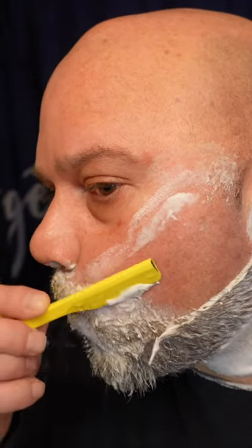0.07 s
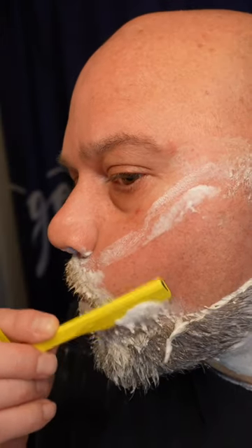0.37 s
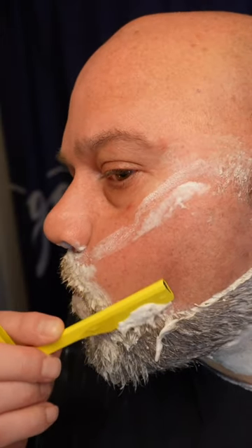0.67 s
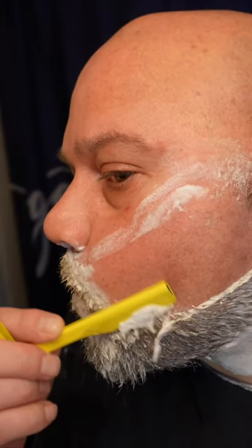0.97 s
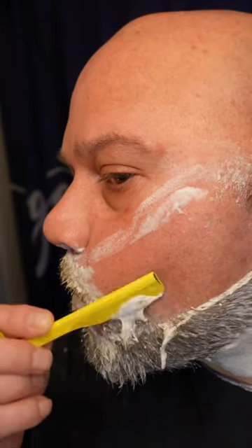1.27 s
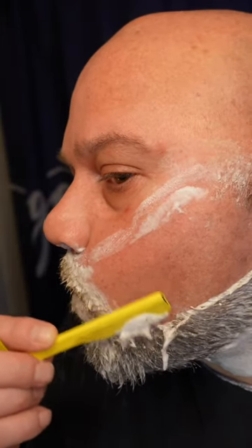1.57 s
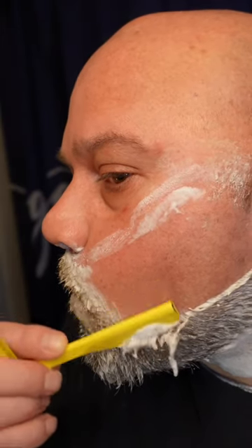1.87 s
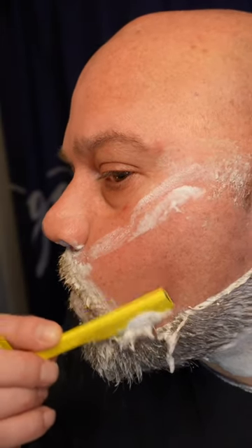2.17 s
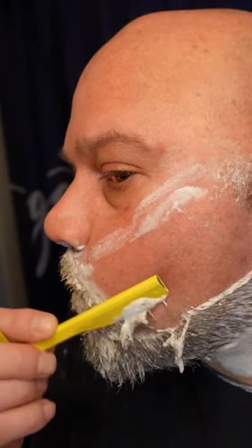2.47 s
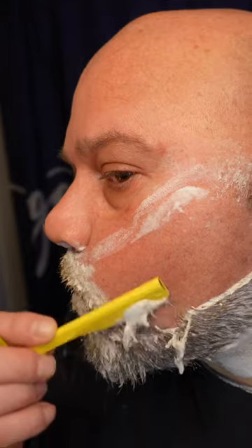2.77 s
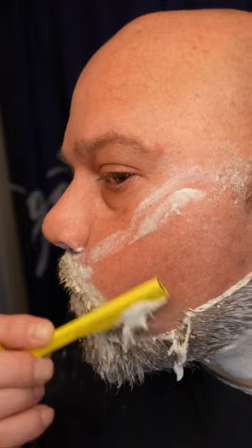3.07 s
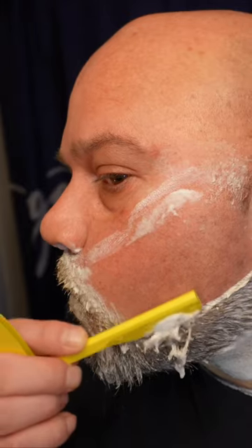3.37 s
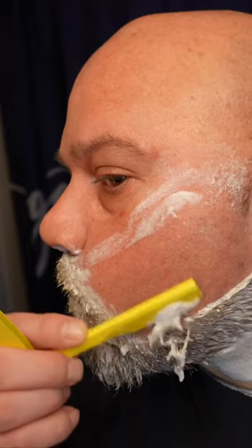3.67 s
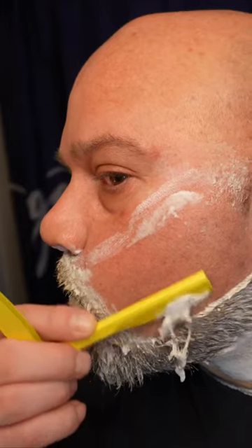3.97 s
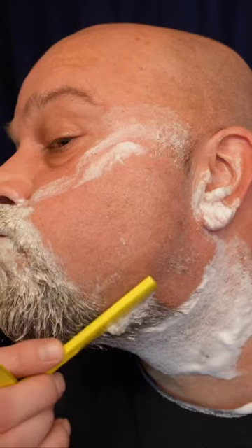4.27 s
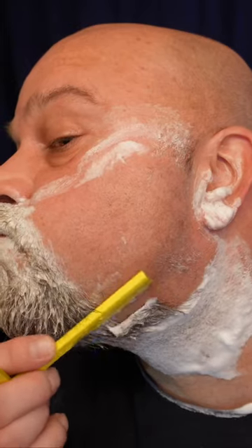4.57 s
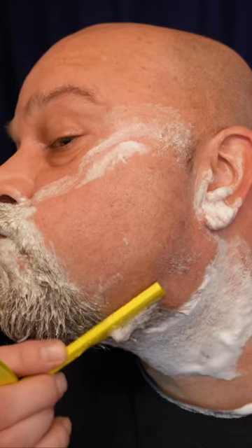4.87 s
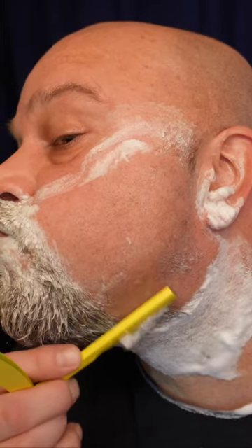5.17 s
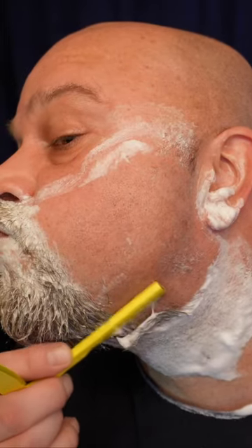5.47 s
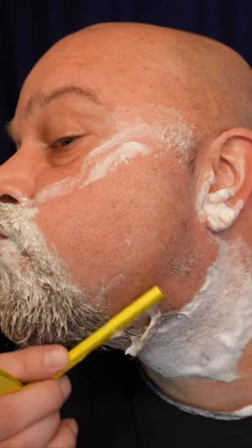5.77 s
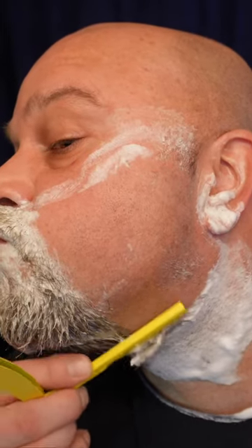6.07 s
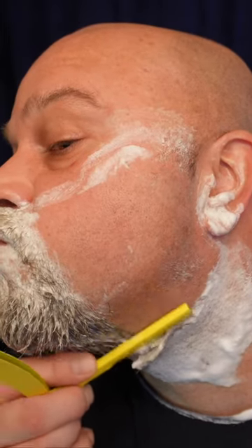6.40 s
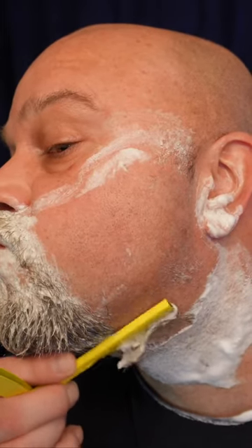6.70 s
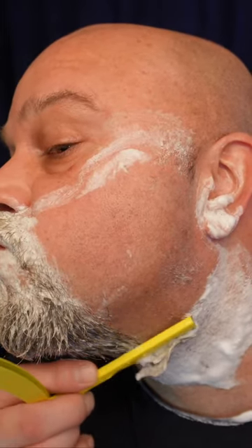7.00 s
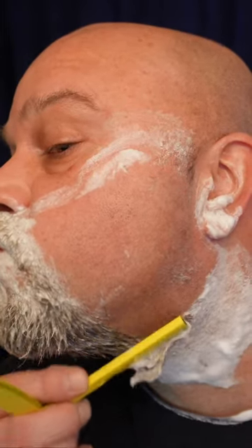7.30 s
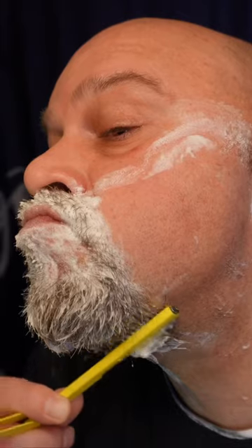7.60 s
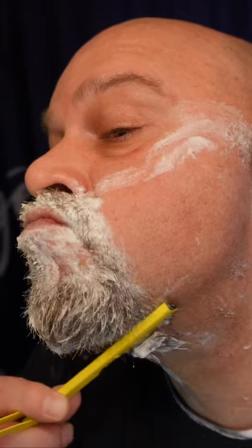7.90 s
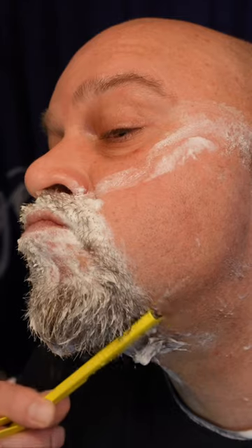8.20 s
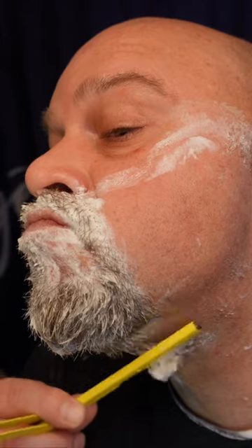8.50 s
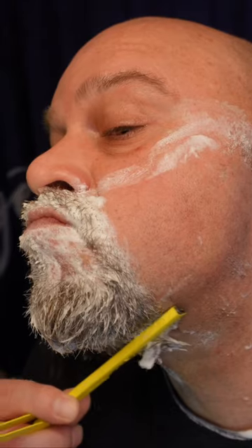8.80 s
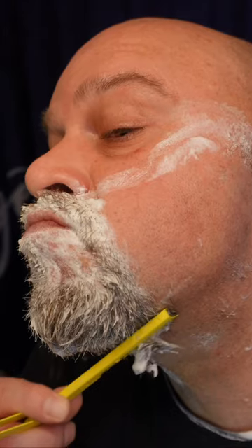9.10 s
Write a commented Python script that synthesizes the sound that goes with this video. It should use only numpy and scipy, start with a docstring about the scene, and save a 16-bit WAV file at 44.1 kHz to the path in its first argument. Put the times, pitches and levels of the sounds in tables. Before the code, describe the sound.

A straight razor scrapes through lathered stubble in short, regular, crackling strokes, close up in a quiet room with a faint hum.

```python
"""Straight razor on lathered stubble.

Short, close strokes in a quiet room: cheek, then jaw, then neck. The edge cuts thousands of fine
hairs and snaps single coarse ones; every cut rings in blade and holder. Sliding back over wet skin,
the blade squeaks faintly. Behind it: appliance hum, a soft whirr, rumble and hiss."""
import sys
import numpy as np
from scipy import signal
from scipy.fft import rfft, irfft
from scipy.io import wavfile

SR = 44100
rng = np.random.default_rng(int(sys.argv[2]) if len(sys.argv) > 2 else 0)


def wav_record(signal):
    """Record a signal, one row per channel, as 16-bit PCM in the file named by sys.argv[1]."""
    frames = np.transpose(np.atleast_2d(signal))
    bounded = np.clip(frames, -1, 1)
    # unit amplitude maps onto the largest positive 16-bit level
    quanta = np.round(bounded * 32767).astype(np.int16)
    wavfile.write(sys.argv[1], SR, quanta)


N = 407925
TIME = np.arange(N) / SR
JAW_FROM_S, NECK_FROM_S = 4.015, 7.3
LANDING_DB, LANDING_S = 2, .012   # edge lands this much lighter; settling time
PRESS_DB_PER_S = 14   # hand bears down as it pulls
STALL_S, TUFT_S = 0.021, 0.0096   # edge hangs before digging in; edge held by a tuft
FACE_CRACK_HZ, NECK_CRACK_HZ, CRACK_SPREAD = 6900, 5000, 0.12   # thicker neck whiskers crack lower
FIRM_DB, FIRM_RING_DB_PER_DB = -33, 0.18   # above this force the holder rings more
CUTOFF_HZ = 16000

# strokes: landing t/s, light phase/s, dug-in phase/s, light level/dB, full level/dB,
# stall depth/dB, treble from blade angle/dB
STROKE_PLAN = [(0.087, 0.1, 0.032, -40.5, -33, 1, 1.5), (.5, 0.089, 0.051, -36.5, -29, 0.5, 0.5),
               (0.913, 0.069, 0.08, -38, -33, 2, -1.5), (1.302, 0.073, 0.065, -34.5, -29.5, -1.5, -1.5),
               (1.685, 0.063, 0.075, -37, -27.5, -2, 1), (2.075, 0.032, 0.11, -39.5, -33.5, -3.5, -1.5),
               (2.431, 0.043, 0.086, -48.5, -34.5, -2, .5), (2.805, .043, 0.054, -40, -37, 3, 0.5),
               (3.149, 0.067, 0.13, -44.5, -41.5, 1.5, -0.5), (3.55, .048, 0.084, -43, -44.5, 0.5, 0),
               (3.888, .058, .057, -53.5, -43, -1, 0), (4.12, 0.13, 0.047, -43.5, -36, 6, -6),
               (4.525, 0.051, 0.12, -48.5, -44, 0, 2.5), (4.945, 0.11, 0.093, -47, -35, 0.5, -3.5),
               (5.433, 0.12, 0.047, -35.5, -31.5, 15, -2.5), (5.862, .072, 0.11, -42.5, -37, 3, -1),
               (6.273, .087, 0.11, -46, -39.5, -2.5, -3), (6.706, 0.043, 0.15, -45, -43.5, -1.5, -4),
               (7.419, 0.12, 0.067, -45.5, -34, 5, 0), (7.783, 0.16, 0.028, -44, -36, 6, 0.5),
               (8.232, 0.14, 0.051, -42, -36, 8.5, 2.5), (8.663, 0.11, 0.083, -46, -40, 4, 2),
               (9.13, 0.042, 0.062, -46.5, -40, 0, -0.5)]
# tufts catching the edge, mostly at lift-off: t/s, level/dB
TUFT_CATCHES = [(0.023, -45.5), (0.31, -42.5), (0.696, -38), (1.494, -38.5), (1.886, -39.5), (2.261, -36.5),
                (2.646, -42.5), (2.955, -45.5), (3.995, -42.5), (4.193, -38), (4.38, -43.5), (4.834, -40.5),
                (5.121, -28), (5.658, -40.5), (6.034, -40), (6.121, -41), (6.522, -39), (6.968, -41.5),
                (7.192, -55), (7.452, -42.5), (7.652, -51), (8.083, -37.5), (8.418, -33.5)]
# light return slides: start t/s, end t/s, level/dB
RETURN_SLIDES = [(.44, 0.488, -57), (1.572, 1.612, -58), (4.073, 4.11, -56), (6.56, 6.697, -60),
                 (6.92, 6.965, -51), (7.677, 7.776, -54), (8.027, 8.064, -52.5), (9.042, 9.11, -60)]
# loudest whisker snaps: t/s, relative level/dB, f/Hz
WHISKER_SNAPS = [(0.193, -4, 5000), (.216, -5, 5800), (.3125, -10, 9500), (.5657, 1, 6500),
                 (.6013, 0.5, 8300), (.6104, 0, 6700), (0.6271, 2.5, 5900), (0.6384, -1.5, 6900),
                 (1.0462, 1, 6000), (1.3385, -3, 5700), (1.374, 0.5, 6500), (1.391, 0, 6700),
                 (1.4036, -3, 6500), (1.432, 0, 6500), (1.4429, -2, 6700), (1.4469, 0, 6700),
                 (1.7237, -1, 7600), (1.736, 1.5, 8640), (1.7637, 3, 8900), (1.7934, 0, 8700),
                 (1.8883, -7.5, 7400), (2.1536, -1, 6700), (2.1927, -0.5, 6500), (2.2256, -3.5, 8900),
                 (2.4679, -6, 7900), (2.5523, -23, 6700), (2.6481, -10, 8500), (2.9285, -7.5, 5900),
                 (3.7577, -18.5, 9700), (3.9224, -25, 7100), (4.138, -9, 7400), (4.1687, -10.5, 6500),
                 (4.1905, -8.5, 6300), (4.205, -12, 4500), (4.2423, -8.5, 6800), (4.3885, -19.5, 9400),
                 (4.5732, -8.5, 11300), (4.6349, -8.5, 10900), (4.654, -11, 7800), (4.6822, -11, 6300),
                 (5.1064, -8, 6300), (5.5233, -9.5, 8780), (5.5552, -4.5, 5850), (5.8613, -14, 5570),
                 (6.2, -24, 7800), (6.451, -5.5, 6540), (6.5313, -11, 5600), (6.711, -30, 6430),
                 (6.9131, -11, 7000), (7.417, -19.5, 3900), (7.4261, -14, 4500), (7.4576, -15.5, 3700),
                 (7.4835, -19, 3750), (7.529, -15, 5100), (7.8694, -12.5, 4060), (7.9113, -9, 4370),
                 (8.0783, -16, 7000), (8.2714, -19, 4180), (8.286, -11.5, 3500), (8.4252, -32, 6000),
                 (8.7455, -10, 5270), (9.1299, -19.5, 5700), (9.1439, -14, 4000), (9.185, -9, 4400),
                 (9.1961, -8.5, 4500)]
# squeaks on wet skin: t/s, length/s, start f/Hz, middle f/Hz, end f/Hz, level/dB
SKIN_SQUEAKS = [(0.796, 0.15, 5300, 5250, 4630, -59), (1.157, 0.085, 4420, 4580, 4120, -56),
                (3.082, .09, 4200, 4470, 4500, -56), (3.414, 0.16, 4600, 4530, 4300, -55.5),
                (3.796, 0.12, 4500, 4620, 4550, -58), (5.689, 0.079, 3000, 3170, 3230, -54),
                (5.742, 0.064, 4400, 4230, 3920, -55), (7.623, 0.2, 10500, 11900, 10600, -59)]
# holder's freedom to ring in the grip, below about 3 kHz: t/s, level/dB
GRIP_RING = [(.2, 3.5), (.6, 2.5), (1.0, 1), (1.5, 1.5), (2.7, .5), (3.3, -3.5), (4.3, -.5), (5.6, 0),
             (6.4, 1), (6.85, -1.5), (7.5, 2.5), (9.2, 1)]
# razor colour per position: f/Hz, relative level/dB
CHEEK_COLOUR = [(600, -44), (1100, -32), (1400, -22.5), (1680, -20.5), (1950, -10.5), (3500, -9),
                (5000, -8), (8500, -5.5), (10500, -15), (13000, -16.5), (15500, -26)]
JAW_COLOUR = [(600, -27), (1100, -29), (1650, -13), (1950, -8), (3500, -8.5), (5000, -9), (8500, -2.5),
              (10500, -11), (13000, -10.5), (15500, -20)]
NECK_COLOUR = [(600, -52), (1100, -26), (1650, -17.5), (1900, -14), (3500, -13.5), (5000, -11.5),
               (8500, -4.5), (10500, -15.5), (13000, -18.5), (15500, -28)]
# blade and holder resonances per position: f/Hz, width/Hz, level/dB
CHEEK_PEAKS = [(1880, 150, 1), (2412, 246, 9), (3170, 340, 1.5), (4700, 340, 4), (5360, 300, 7),
               (6420, 260, 4), (7905, 720, 5.5), (12700, 600, 3)]
JAW_PEAKS = [(2114, 122, 9.7), (2340, 126, 6.2), (3230, 650, 1.5), (4930, 1250, 7.3), (6300, 160, 1.8),
             (7600, 310, 3.6), (11900, 270, 2.5)]
NECK_PEAKS = [(1950, 480, 8.8), (2750, 170, 11), (4280, 1230, 10.6), (5020, 520, 9.4), (6350, 130, 9.7),
              (7340, 1100, 0.93), (13750, 590, 4.7)]
# appliance hum: harmonic number, relative level/dB
HUM_HARMONICS = [(1, -2), (3, -20.5), (4, -13), (5, -19), (6, -25), (8, -23)]
# first hum's swell, lower hum's fade: t/s, level/dB
HUM_SWELL = [(0, -58.5), (1.7, -59), (2.7, -57), (3.1, -55.5), (4.0, -54.5)]
LOW_HUM_FADE = [(4.0, -61), (5.5, -66), (7.0, -67.5), (9.2, -75)]
# whirr swells: peak t/s, level/dB, rise/(dB/s), fall/(dB/s)
WHIRR_ENVELOPE = [(1.9, -59.5, 68, 24), (3.6, -61, 26, 28)]
# spectra of whirr, rattle, room noise before and after JAW_FROM_S: f/Hz, relative level/dB
WHIRR_COLOUR = [(100, -17), (210, -9.5), (275, 1), (345, 5), (410, -7), (900, -24), (4000, -34)]
RATTLE_COLOUR = [(300, -18), (750, -10), (980, -9), (1170, -2.5), (1400, -10), (2000, -8.5), (3500, -13),
                 (10000, -27)]
EARLY_ROOM_COLOUR = [(20, -1), (45, -3), (110, 2.5), (200, -2), (320, 0), (450, -2.5), (800, -4),
                     (1200, -9), (2200, -11), (5000, -10), (8500, -11), (11000, -17.5), (16000, -23)]
LATE_ROOM_COLOUR = [(20, -4), (45, -6.5), (125, 0), (170, -2), (370, -1), (550, -4.5), (880, -3.5),
                    (1150, -8.5), (2200, -11.5), (5000, -11), (8500, -11.5), (11000, -19), (16000, -25.5)]
# late room noise resonances: f/Hz, width/Hz, level/dB
LATE_ROOM_PEAKS = [(127, 11, 4.5), (460, 15, 3.5), (695, 10, 11.5)]


def drag(rise_db_per_s=1100, dig_db_per_s=1200, lift_db_per_s=320, graze_db=-16, graze_db_per_s=115,
         approach_db_per_s=350, catch_db_per_s=4000, release_db_per_s=700):
    """Force on the edge: strokes land, stall, dig in, lift off grazing; tufts tug, slides rub."""
    t, power = TIME[::40], 1e-12
    for land, light_s, full_s, light_db, full_db, stall_db, _ in STROKE_PLAN:
        dig = land + light_s
        lift = dig + full_s
        held = np.clip(t, land, lift)
        before, after = np.maximum(land - t, 0), np.maximum(t - lift, 0)
        ease = LANDING_DB * np.exp((land - held) / LANDING_S)
        stall = stall_db * np.exp(-((held - dig + STALL_S) / STALL_S) ** 2)
        light = light_db + PRESS_DB_PER_S * (np.minimum(held, dig) - (land + dig) / 2) - stall - ease
        full = full_db + PRESS_DB_PER_S * (held - (dig + lift) / 2)
        full -= dig_db_per_s * np.maximum(dig - held, 0)
        pull = -rise_db_per_s * before - lift_db_per_s * after
        graze = graze_db - approach_db_per_s * before - graze_db_per_s * after
        same_place = (t < JAW_FROM_S) == (land < JAW_FROM_S)   # a stroke's sound stops abruptly at JAW_FROM_S
        power += same_place * from_db(np.maximum(light, full) + np.maximum(pull, graze)) ** 2
    for start, end, db in RETURN_SLIDES + [(s, s + TUFT_S, db) for s, db in TUFT_CATCHES]:
        fade_db = catch_db_per_s * np.maximum(start - t, 0) + release_db_per_s * np.maximum(t - end, 0)
        power += from_db(db - fade_db) ** 2
    return np.interp(TIME, t, np.sqrt(power))


def scrape(hairs_per_s=1300, spread_db=4.0, clump_db=1.57, cut_db=-3.0, rub_db=-5.0):
    """A harder stroke meets more hairs; they stand in clumps, and the edge rubs the skin between."""
    force = drag()
    per_s = hairs_per_s * np.maximum(force / from_db(-38), .1) ** .6
    hairs = from_db(cut_db + clump_db * drift(108)) * cuts(per_s, spread_db)
    return force * (hairs + from_db(rub_db) * rng.standard_normal(N))


def cuts(per_s, spread_db):
    """Hairs part at random moments with random force; unit power."""
    parted = rng.random(N) < per_s / SR
    force = from_db(spread_db * np.minimum(rng.exponential(1, N), 4))
    return unit_rms(parted * force * rng.choice([-1, 1], N) / np.sqrt(per_s))


def whiskers(crack_db=-2.5, ref_cycles=0.39, ref_hz=6000, thud_db=-28.0, thud_hz=2350, thud_s=0.0014,
             recoil_db=-5.5, recoil_s=0.0013, size=400):
    """A coarse whisker cracks; the freed blade springs back and chatters into its neighbours."""
    out, t = np.zeros(N + size), np.arange(size) / SR
    spring = np.sin(2 * np.pi * thud_hz * t) * np.exp(-t / thud_s)
    chatter = rng.standard_normal(N + size)
    for s, db, hz in WHISKER_SNAPS + lesser_snaps():
        at = int(np.clip(s * SR, 0, N - 1))
        cycles = ref_cycles * (ref_hz / hz) ** 2   # thick whiskers crack lower, ring longer
        crack = np.cos(2 * np.pi * hz * t) * from_db(-30 * hz * t / cycles)
        recoil = chatter[at:at + size] * np.exp(-t / recoil_s)
        snap = unit_rms(crack) + from_db(thud_db) * unit_rms(spring)
        snap += from_db(recoil_db) * unit_rms(recoil)
        out[at:at + size] += from_db(db + crack_db) * snap / np.sqrt(size)
    return out[:N]


def lesser_snaps(per_s=40, over_drag_db=21.0, spread_db=1.5, ceiling_db=-5.5, min_drag_db=-50):
    """Random snaps while the edge cuts, louder with its pull. Rows: t/s, level/dB, f/Hz."""
    force_db = 20 * np.log10(drag())
    at = np.flatnonzero((rng.random(N) < per_s / SR) & (force_db > min_drag_db))
    strength, pitch = rng.standard_normal((N, 2))[at].T
    db = np.minimum(force_db[at] + over_drag_db + spread_db * strength, ceiling_db)
    hz = np.where(TIME[at] < NECK_FROM_S, FACE_CRACK_HZ, NECK_CRACK_HZ) * np.exp(CRACK_SPREAD * pitch)
    return list(zip(TIME[at], db, hz))


def contact(force, wander_db=2.3, wander_hz=45):
    """Grip sets the low ring, blade angle the treble; bands waver as contact wanders along the edge."""
    lowpasses = [signal.butter(3, hz, fs=SR, output="sos") for hz in (3100, 6300, 10000)]
    below = [signal.sosfiltfilt(sos, force) for sos in lowpasses]
    bands = np.diff([np.zeros(N), *below, force], axis=0)
    treble_db = curve([(land + light_s, db) for land, light_s, *_, db in STROKE_PLAN])
    ring_db = curve(GRIP_RING) + FIRM_RING_DB_PER_DB * np.maximum(20 * np.log10(drag()) - FIRM_DB, 0)
    gains_db = [ring_db, -treble_db / 2, treble_db / 2, treble_db]
    return sum(band * from_db(db + wander_db * drift(wander_hz)) for band, db in zip(bands, gains_db))


def razor(force):
    """Cuts ring in blade and holder; one response per position."""
    place = np.digitize(TIME, [JAW_FROM_S, NECK_FROM_S])
    bodies = [(CHEEK_COLOUR, CHEEK_PEAKS), (JAW_COLOUR, JAW_PEAKS), (NECK_COLOUR, NECK_PEAKS)]
    return sum(convolve(force * (place == k), response(*body)) for k, body in enumerate(bodies))


def bending(x):
    """Bending waves in thin steel spread each crack over a few cycles: two all-passes."""
    for radius, hz in [(.8, 4300), (.74, 7000)]:
        poles = [1, -2 * radius * np.cos(2 * np.pi * hz / SR), radius * radius]
        x = signal.lfilter(poles[::-1], poles, x)
    return x


def squeaks():
    """Stick-slip on skin: a thin, unsteady tone that arches with blade speed."""
    out, waver = np.zeros(N), 1 + .017 * drift(300)
    for start_s, length_s, *pitches_hz, db in SKIN_SQUEAKS:
        on = (TIME > start_s) & (TIME < start_s + length_s)
        progress = (TIME[on] - start_s) / length_s
        hz = np.polyval(np.polyfit([0, .5, 1], pitches_hz, 2), progress) * waver[on]
        out[on] += from_db(db) * np.sin(np.pi * progress) * np.sin(2 * np.pi * np.cumsum(hz) / SR)
    return out


def reflections(x):
    """Quick echoes off face and hand, then a curtained room's short tail."""
    near = echoes(x, level_db=-14.0, first_s=.0004, t60_s=.012)
    return near + echoes(x, level_db=-11.0, first_s=0.0035, t60_s=0.17)


def echoes(x, level_db, first_s, t60_s):
    """Decaying cloud of reflections."""
    t = TIME[:SR // 2]
    cloud = rng.standard_normal(len(t)) * from_db(-60 * t / t60_s) * (t > first_s)
    return convolve(x, from_db(level_db) * cloud / np.linalg.norm(cloud))


def hum(first_hz=91.1, low_hz=65.7, buzz_db_per_db=4.5):
    """Appliance hum, buzzier as it swells; gives way to a lower, wavering one."""
    level_db = curve(HUM_SWELL)
    buzz = from_db(buzz_db_per_db * (level_db - level_db.mean()))
    first = np.zeros(N)
    for k, db in HUM_HARMONICS:
        cycles = k * first_hz * TIME + rng.random()
        first += from_db(db) * (buzz if k > 1 else 1) * np.sin(2 * np.pi * cycles)
    low_db = curve(LOW_HUM_FADE) + 2.0 * drift(8.9)
    low = from_db(low_db) * np.sin(2 * np.pi * low_hz * TIME + 1.2 * drift(5.7))
    blend = np.clip((TIME - JAW_FROM_S) / .02 + .5, 0, 1)
    return np.sqrt(2) * ((1 - blend) * from_db(level_db) * first + blend * low)


def whirr(rattle_db=-59.5):
    """Low whirr, swelling twice; a faint rattle rides the second swell."""
    gain = sum(from_db(db - np.maximum(rise * (s - TIME), fall * (TIME - s)))
               for s, db, rise, fall in WHIRR_ENVELOPE)
    rattle_gate = curve([(2.9, 0), (3.3, 1), (3.95, 1), (4.03, 0)])
    return gain * noise(WHIRR_COLOUR) + from_db(rattle_db) * rattle_gate * noise(RATTLE_COLOUR)


def room_noise(early_db=-58.0, late_db=-57.0, side_db=-81.5):
    """Soft rumble and hiss, nearly mono; its colour shifts at JAW_FROM_S."""
    early = from_db(early_db) * noise(EARLY_ROOM_COLOUR)
    late = from_db(late_db) * noise(LATE_ROOM_COLOUR, LATE_ROOM_PEAKS)
    side = from_db(side_db) * noise([(30, -5), (150, 5.0), (500, -1), (1200, -16.5), (16000, -21)])
    return np.where(TIME < JAW_FROM_S, early, late) + side * np.array([[1], [-1]])


def noise(colour, peaks=()):
    """Coloured noise, unit power."""
    return convolve(rng.standard_normal(N), response(colour, peaks))


def response(colour, peaks=(), size=4096):
    """Minimum-phase impulse response, unit energy: broad colour plus resonances."""
    hz = np.maximum(np.arange(size // 2 + 1) * SR / size, 1)
    colour_hz, colour_db = np.transpose(colour)
    level_db = np.interp(np.log(hz), np.log(colour_hz), colour_db)
    for centre_hz, width_hz, db in peaks:
        level_db += db / (1 + (2 * (hz - centre_hz) / width_hz) ** 2)
    cepstrum = irfft(np.log(from_db(level_db)))[:size // 2]
    ring = irfft(np.exp(rfft(2 * cepstrum, size)))
    return ring / np.linalg.norm(ring)


def drift(corner_hz):
    """Slow random wander, unit RMS."""
    pole = np.exp(-40 * np.pi * corner_hz / SR)   # runs at SR / 20
    white = rng.standard_normal(N // 20 + 2002)
    slow = signal.lfilter([1], [1, -2 * pole, pole * pole], white)[2000:]
    return np.interp(np.arange(N) / 20, np.arange(len(slow)), unit_rms(slow))


def convolve(x, ring):
    """Apply an impulse response; N samples."""
    return signal.oaconvolve(x, ring)[:N]


def curve(rows):
    """Straight lines through rows of t/s, value."""
    return np.interp(TIME, *np.transpose(rows))


def unit_rms(x):
    """Scale to unit power."""
    return x / np.sqrt(np.mean(x ** 2) + 1e-20)


def from_db(db):
    """Decibels to gain."""
    return 10 ** (np.asarray(db) / 20)


def scene():
    """Razor close and centred, room behind."""
    room = hum() + whirr() + room_noise()
    shave = squeaks() + bending(razor(contact(scrape() + whiskers())))
    return shave + reflections(shave) + room


def record(dry):
    """Steep elliptic low-pass."""
    return signal.sosfilt(signal.ellip(10, .2, 80, CUTOFF_HZ, fs=SR, output="sos"), dry)


dry = scene()
out = record(dry)
wav_record(out)
```